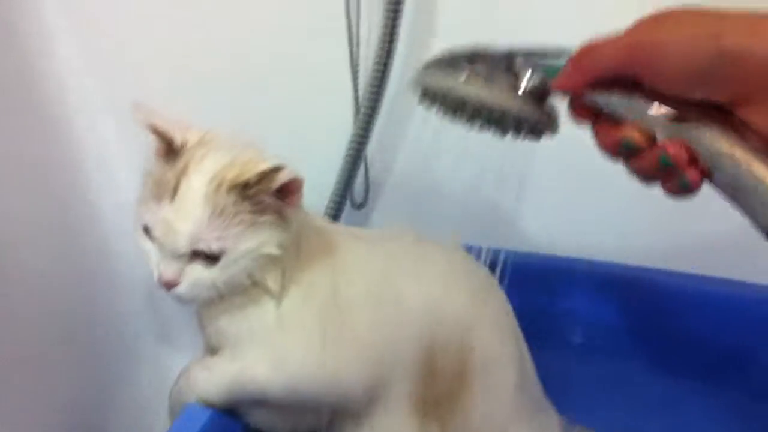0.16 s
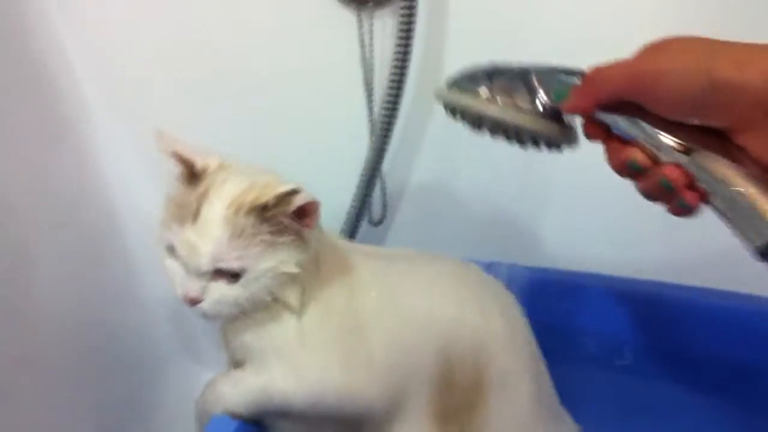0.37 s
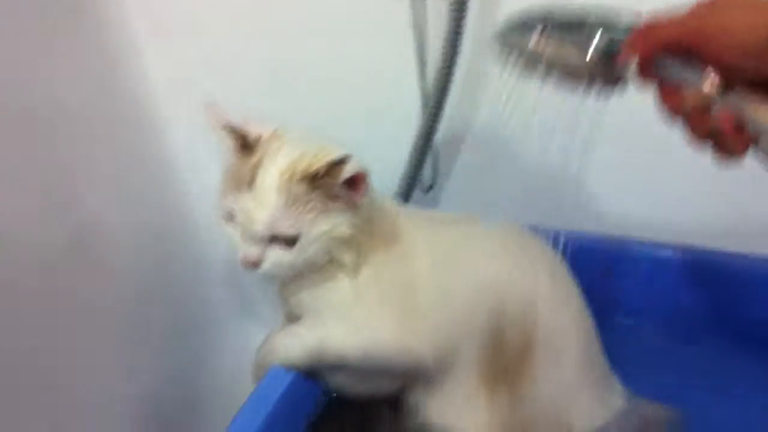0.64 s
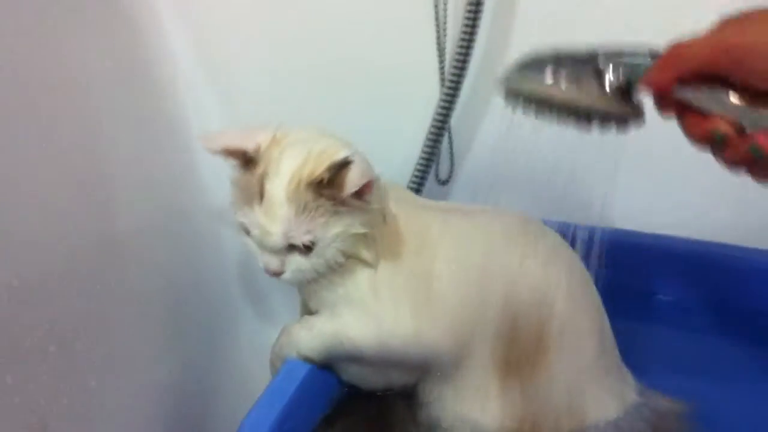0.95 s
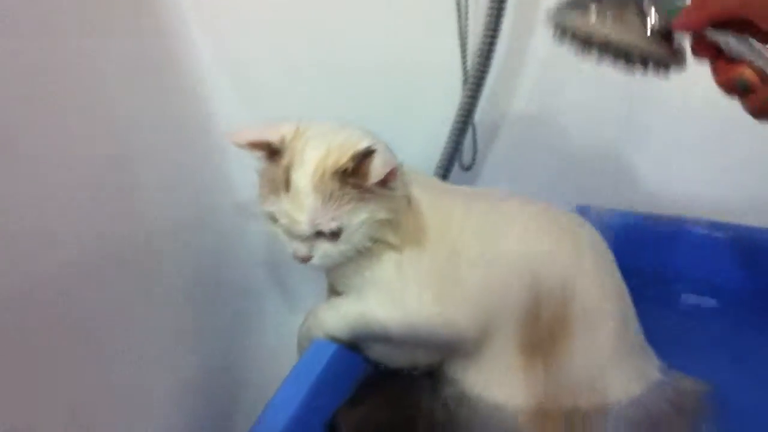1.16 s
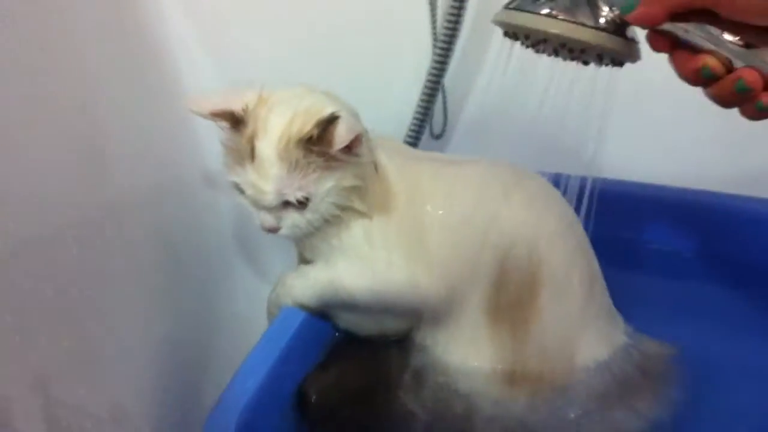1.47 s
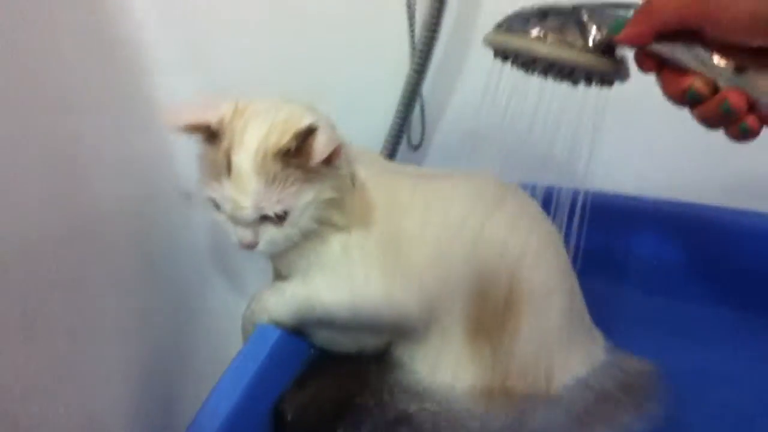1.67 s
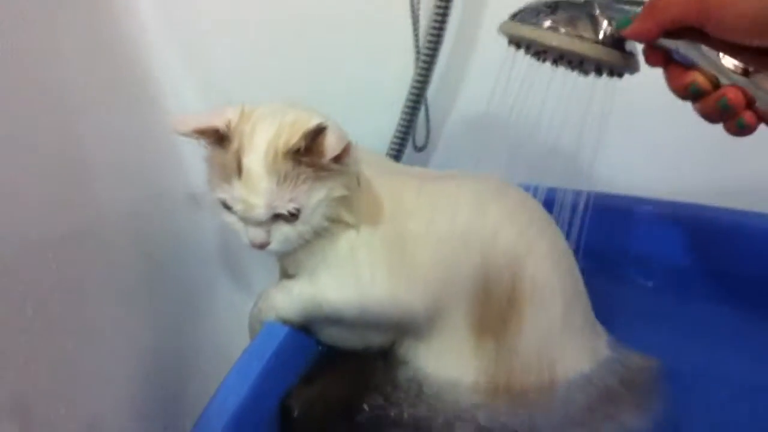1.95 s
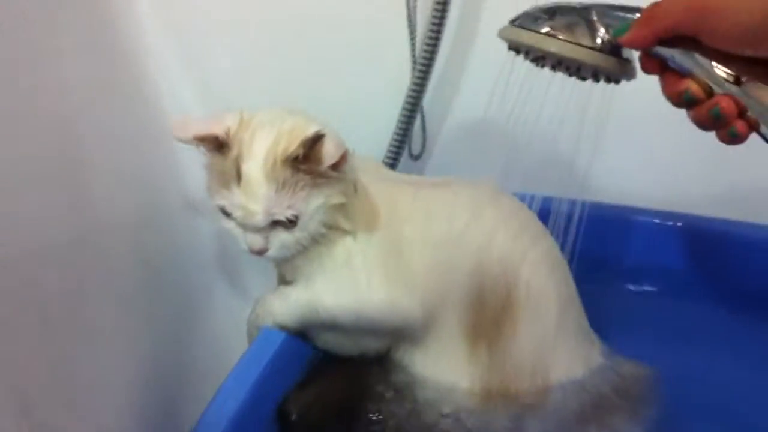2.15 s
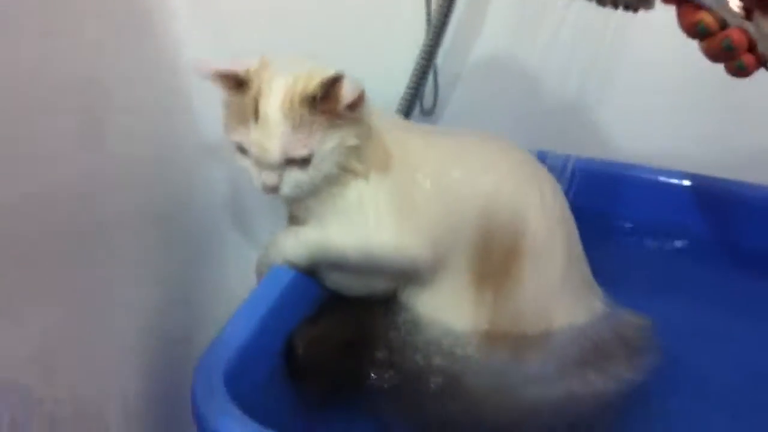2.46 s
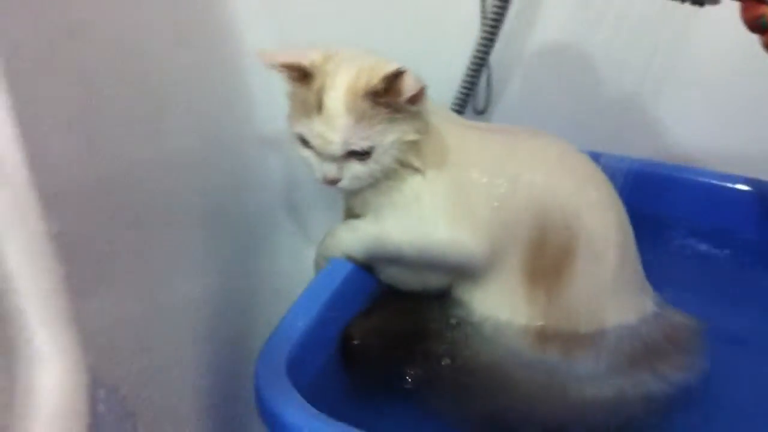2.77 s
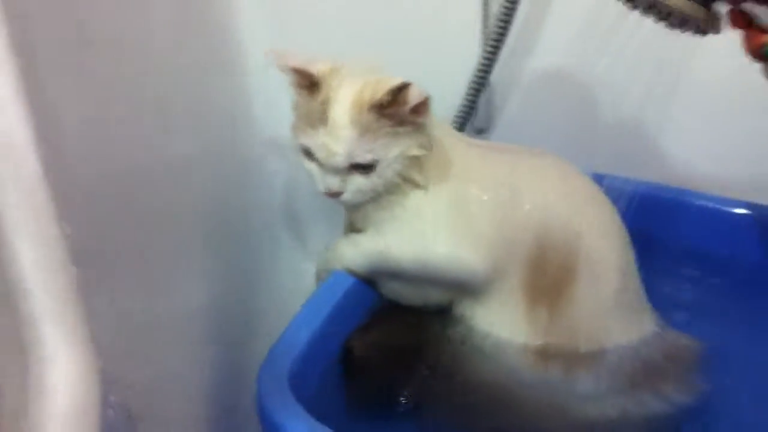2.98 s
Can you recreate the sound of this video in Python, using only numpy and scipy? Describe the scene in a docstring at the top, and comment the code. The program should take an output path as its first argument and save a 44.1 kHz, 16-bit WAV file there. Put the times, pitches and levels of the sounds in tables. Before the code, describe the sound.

Already running at 0 s, a hand shower hisses steadily while its jets patter and fizz on fur and bath water, with bubbling and plops. Splashing swells near 0.4, 0.7 and 1.1 s, where a soft low bump sounds; a brighter spatter with falling bubbles comes at 1.4 s. Bubbling continues, thinning after 2.5 s, with a very high click at 3.0 s. Faint hum and rumble, small tiled room.

```python
"""Water patters and fizzes at once over a steady hiss: a hand shower sprays a cat in a filled plastic tub.
Drops are filtered clicks with a fizz of tiny bubbles; they swell when the jets swing off the fur onto water.
Fading tones make the low bubbling, plops, ticks and splashes, in a small tiled bathroom. A soft bump is heard.
The hiss of the nozzles and a low rumble are filtered noise; a mains hum of pure tones lies underneath."""
import sys
import numpy as np
from scipy import signal
from scipy.fft import rfft, irfft, next_fast_len
from scipy.io import wavfile
from scipy.ndimage import uniform_filter1d

SR = 44100
rng = np.random.default_rng(int(sys.argv[2]) if len(sys.argv) > 2 else 0)


def generate_wav(sig):
    """Save sig (samples, or channels by samples) to the path in sys.argv[1] as 16-bit PCM at SR."""
    pcm = np.round(np.clip(np.atleast_2d(sig).T, -1, 1) * 32767).astype(np.int16)
    wavfile.write(sys.argv[1], SR, pcm)


N = 137592  # length in samples

# jets striking water and fur: [t/s, level/dB before the swing is widened]
PATTER_LEVEL = [(0, -40.5), (.09, -40.5), (.18, -44.5), (.32, -42), (.39, -40.5), (.5, -46.5), (.6, -42),
                (.69, -38.5), (.77, -45.5), (.87, -48), (.97, -43), (1.1, -38.5), (1.15, -41.5),
                (1.23, -48), (1.34, -46), (1.41, -39.5), (1.5, -39), (1.72, -40), (2.06, -43.5),
                (2.22, -43.5), (2.33, -43), (2.45, -46), (2.83, -49.5), (2.92, -44.5), (3.12, -45)]
# jets churning the bath: [t/s, level/dB before the mix of large and small bubbles]
CHURN_LEVEL = [(.02, -53), (.075, -43), (.14, -60), (.32, -52.5), (.37, -43.5), (.43, -53), (.5, -67),
               (.62, -56), (.68, -45.5), (.76, -51), (.84, -61), (.98, -55), (1.045, -45.5), (1.08, -40.5),
               (1.14, -45.5), (1.18, -59), (1.27, -51), (1.36, -65), (1.435, -42.5), (1.55, -47),
               (1.69, -44), (1.92, -44.5), (1.98, -45), (2.34, -50.5), (2.52, -46.5), (2.62, -62),
               (2.75, -64), (2.83, -53.5), (3.0, -48.5), (3.12, -52)]
# pitch of the large bubbles, lower as the jets dig deeper: [t/s, f/Hz]
BUBBLE_PITCH = [(.34, 1455), (.41, 1136), (.63, 1460), (.69, 1157), (.8, 940), (1.02, 1487), (1.09, 1134),
                (1.38, 1610), (1.43, 1277), (1.5, 1025), (1.57, 1345), (1.7, 993), (2.05, 1168),
                (2.35, 1029), (2.65, 1350), (2.9, 1128)]
# single plops, from blunt drop impacts to ringing large bubbles: [t/s, level/dB before fade and room, f/Hz,
# ring/cycles]
PLOP_TONES = [(0.0722, -28, 1250, 13), (0.1073, -38.5, 1421, 61), (.152, -30.5, 1730, 32),
              (0.1694, -35, 1400, 31), (.236, -28.5, 1470, 27), (.243, -28.5, 1356, 32),
              (0.2746, -26, 1110, 20), (.36, -34, 1380, 28), (.374, -32.5, 1117, 37),
              (.485, -35.5, 1230, 33), (.5229, -40, 1400, 60), (.577, -30, 1370, 28),
              (.602, -27.5, 1350, 18), (0.6544, -35, 1395, 65), (.673, -30, 990, 28),
              (0.695, -30.5, 994, 38), (1.0004, -28.5, 1350, 50), (1.079, -31, 1550, 45),
              (1.092, -36, 1065, 50), (1.135, -28.5, 1960, 59), (1.1364, -31, 1170, 50),
              (1.3967, -29.5, 2450, 43), (1.4535, -35, 1380, 65), (1.484, -36, 960, 42),
              (1.518, -36, 995, 56), (1.5741, -34.5, 1730, 80), (1.702, -35, 874, 47),
              (1.806, -30.5, 890, 24), (1.9172, -33, 1240, 45), (2.0194, -35, 985, 51),
              (2.1208, -35.5, 988, 67), (2.2022, -27.5, 1023, 15), (2.3046, -37.5, 960, 77),
              (2.3831, -33.5, 1043, 55), (2.997, -32.5, 1194, 49)]
# sharp ticks: tiny bursting bubbles, but the last row is a short, very high click of unknown cause:
# [t/s, level/dB before fade and room, f/Hz]
TICK_TONES = [(0.3928, -19, 12300), (.456, -22.5, 10400), (.641, -26.5, 4900), (0.839, -27, 7200),
              (1.3674, -18, 6560), (1.435, -15, 7350), (1.86, -27, 7000), (2.184, -26.5, 7100),
              (2.326, -23, 12200), (2.5389, -24, 8300), (2.87, -31, 4960), (2.971, -28, 4860),
              (3.0075, -14.5, 13600)]
# tone colour of the hiss, the drop impacts and the rumble: [f/Hz, relative level/dB]
NOZZLE_COLOUR = [(500, -18.5), (1200, -2.5), (2300, 4.5), (3300, 5), (4500, 0.5), (6500, -6.5), (8000, 4),
                 (10300, -12), (12500, 2.5), (17000, -0.5)]
SPLASH_COLOUR = [(400, -13), (800, -2.5), (1400, 1), (2300, 1.5), (3500, 0), (5000, 0.5), (7000, 1),
                 (13000, 2.5), (17000, -3)]
RUMBLE_COLOUR = [(22, -21), (40, -38), (70, -13), (100, 3.5), (145, -6), (190, 3), (340, 0.5), (500, -4.5),
                 (750, -8.5), (1600, -29)]
# mains hum lines and a weak neighbour: [f/Hz, rms level/dB]
HUM_TONES = [(100.1, -65), (119, -79), (200.4, -69)]
# tones of the bumped tub: [f/Hz, level/dB before rise and fade, ring/cycles]
KNOCK_TONES = [(119.4, -49, 53), (184, -44, 24), (309, -39.5, 48)]
# quick sweeps of the jets that slap the bath: [t/s, half width/s, level/dB before the room]
SLAP_SWEEPS = [(.38, 0.022, -46), (0.695, 0.024, -62), (1.116, 0.053, -57)]

# Clouds: _PER_S counts per second, _OCTAVES pitch scatter, _CYCLES typical ring, _SPREAD_DB mean extra size
NOZZLE_DB, RUMBLE_DB = -51, -56.5  # rms
PATTER_DB, PATTER_PER_S, PATTER_SPREAD_DB = 0, 9000, 3.5
PATTER_SWING = 1.2  # stretches the dB swings: open water swings wider than the spray as a whole
SPURT_DB, SPURT_PER_S = 1.11, 45  # random wavering of the patter level
FLICKER_DB, FLICKER_PER_S, FLICKER_BAND_HZ = 1.46, 30, 1530  # wavering of each frequency band
FIZZ_DB, FIZZ_PER_S, FIZZ_HZ = -6, 950, 8320
FIZZ_OCTAVES, FIZZ_CYCLES, FIZZ_SPREAD_DB = 0.53, 20, 2.5
CHURN_DB, CHURN_PER_S, CHURN_OCTAVES, CHURN_CYCLES, CHURN_SPREAD_DB = -1.5, 260, 0.222, 32.5, 1.7
SMALL_DB, SMALL_PER_S, SMALL_RATIO, SMALL_OCTAVES = -5, 260, 1.7, 0.415  # ratio to the large pitch
PLUNGE_S, PLUNGE_WIDTH_S, PLUNGE_DB = 1.415, 0.044, -50
PLUNGE_HZ, PLUNGE_OCTAVES_PER_S = 1940, 10.6  # pitch at PLUNGE_S, and how fast it falls
SPATTER_DB, SPATTER_HZ = -41.5, 5700
SLAP_HZ, SLAP_OCTAVES, SLAP_CYCLES = 3200, 0.25, 9.2
TICK_CYCLES = 39
TRICKLE_DB, TRICKLE_PER_S = -61, 98
KNOCK_S, KNOCK_RISE_S = 1.11, 0.014
ONSET_CYCLES = 0.9  # cycles a bubble takes to start ringing
GLIDE = 0.049  # share by which a bubble's pitch rises as it fades
RING_OCTAVES = 0.74  # ring lengths in a cloud vary by up to this much either way
SCATTER_LIMIT = 1.91  # how far bubble pitches stray, in standard deviations
ROOM_T60_S, ROOM_GAP_S = 0.46, 0.00472  # time to fade by 60 dB; silence before the first echo
ROOM_LOW_DB, ROOM_HIGH_DB = -5.5, -10  # echo against direct sound
TOP_HZ = 15800


def undb(db):
    """Turn decibels into gain."""
    return 10 ** (np.asarray(db) / 20)


def level(x, db):
    """Scale a sound to an rms level."""
    return x * undb(db) / np.sqrt(np.mean(x ** 2))


def curve(table):
    """Join table points with straight lines, one value per sample."""
    return np.interp(np.arange(N) / SR, *np.array(table, float).T)


def walk(rate):
    """Random levels held briefly and smoothed twice; spread near 1."""
    hold = int(SR / rate)
    steps = np.repeat(rng.standard_normal(N // hold + 1), hold)
    smooth = uniform_filter1d(uniform_filter1d(steps, hold), hold)
    return 1.3 * smooth[:N]


def colour(x, points):
    """Filter through the given points, with no sound before its cause."""
    hz, db = np.array(points, float).T
    size = 2 * next_fast_len(N)
    f = np.maximum(np.fft.rfftfreq(size, 1 / SR), 1)
    gain = undb(np.interp(np.log(f), np.log(hz), db))
    # folding the cepstrum forward in time gives the minimum-phase filter
    cepstrum = irfft(np.log(gain))
    cepstrum[1:size // 2] *= 2
    cepstrum[size // 2 + 1:] = 0
    return irfft(rfft(x, size) * np.exp(rfft(cepstrum)))[:N]


def shower_of(per_s, spread_db):
    """Random drops, one in each slot of time: times in s, sizes, and a bell-curve number each."""
    when, heavy, radius, angle = rng.random((int(per_s * N / SR), 4)).T
    times = (np.arange(len(when)) + when) / len(when) * N / SR
    sizes = undb(-spread_db * np.log(1 - heavy * .995))
    scatter = np.sqrt(-2 * np.log(1 - radius)) * np.cos(2 * np.pi * angle)
    return times, sizes, scatter


def bubbles(times, sizes, pitches, cycles):
    """Each bubble swells, rings for some cycles and rises in pitch as it fades by 60 dB."""
    out = np.zeros(N)
    pitches = np.clip(pitches, 100, SR / 2 - 2000)
    rings = cycles * np.ones(len(times))
    for s, size, hz, ring in zip(times, sizes, pitches, rings):
        start = max(int(s * SR), 0)
        length = max(min(int(ring / hz * SR), N - start), 0)
        turns = np.arange(length) * hz / SR
        age = turns / ring  # 0 at birth, 1 at the end
        swell = 1 - np.exp(-(turns / ONSET_CYCLES) ** 2)
        fade = np.exp(-np.log(1000) * age)
        tone = np.sin(2 * np.pi * turns * (1 + GLIDE * age / 2))
        out[start:start + length] += size * swell * fade * tone
    return out


def bubble_cloud(per_s, centre_hz, octaves, cycles, spread_db):
    """Many bubbles, varied in size, ring and pitch around a steady or moving centre; rms 1."""
    times, sizes, scatter = shower_of(per_s, spread_db)
    centres = np.interp(times * SR, np.arange(N), centre_hz * np.ones(N))
    limited = SCATTER_LIMIT * np.tanh(scatter / SCATTER_LIMIT)
    pitches = centres * 2 ** (octaves * limited)
    rings = cycles * 2 ** (RING_OCTAVES * rng.uniform(-1, 1, len(times)))
    return level(bubbles(times, sizes, pitches, rings), 0)


def patter():
    """Dense drop impacts with a fizz of tiny bubbles, swelling as the jets reach open water."""
    times, sizes, force = shower_of(PATTER_PER_S, PATTER_SPREAD_DB)
    clicks = np.bincount((times * SR).astype(int), sizes * np.sign(force), N + 1)[:N]
    impacts = level(colour(clicks, SPLASH_COLOUR), PATTER_DB)
    fizz = bubble_cloud(FIZZ_PER_S, FIZZ_HZ, FIZZ_OCTAVES, FIZZ_CYCLES, FIZZ_SPREAD_DB)
    db = curve(PATTER_LEVEL)
    # swings are stretched downward from the loudest moment
    swell = undb(db.max() + PATTER_SWING * (db - db.max()) + SPURT_DB * walk(SPURT_PER_S))
    return swell * flicker(impacts + undb(FIZZ_DB) * fizz)


def flicker(x):
    """The splash changes colour as the jets wander: overlapping bands waver on their own."""
    spectrum = rfft(x)
    place = np.fft.rfftfreq(N, 1 / SR) / FLICKER_BAND_HZ
    out = np.zeros(N)
    for k in range(14):
        band = irfft(spectrum * np.maximum(1 - abs(place - k), 0), N)
        out += band * undb(FLICKER_DB * walk(FLICKER_PER_S))
    return out


def churn():
    """Air driven under the surface rings as large bubbles and smaller offspring."""
    hz = curve(BUBBLE_PITCH)
    large = bubble_cloud(CHURN_PER_S, hz, CHURN_OCTAVES, CHURN_CYCLES, CHURN_SPREAD_DB)
    small = bubble_cloud(SMALL_PER_S, hz * SMALL_RATIO, SMALL_OCTAVES, CHURN_CYCLES, CHURN_SPREAD_DB)
    return undb(curve(CHURN_LEVEL)) * (undb(CHURN_DB) * large + undb(SMALL_DB) * small)


def plunge():
    """The jets slide off the fur into the bath: a bright spatter, and bubbles that grow and drop in pitch."""
    since = np.arange(N) / SR - PLUNGE_S
    hz = PLUNGE_HZ * 2 ** np.clip(-PLUNGE_OCTAVES_PER_S * since, -1, 1)
    # the negative spread makes a few bubbles weaker instead of stronger
    growing = undb(PLUNGE_DB) * bubble_cloud(500, hz, octaves=0.17, cycles=30, spread_db=-2.0)
    spatter = undb(SPATTER_DB) * bubble_cloud(800, SPATTER_HZ, octaves=0.32, cycles=24, spread_db=2.1)
    return np.exp(-(since / PLUNGE_WIDTH_S) ** 2) * (growing + spatter)


def slaps():
    """Each quick sweep across the bath throws up a burst of mid-sized bubbles."""
    t = np.arange(N) / SR
    swell = sum(undb(db) * np.exp(-((t - s) / width) ** 2) for s, width, db in SLAP_SWEEPS)
    return swell * bubble_cloud(1500, SLAP_HZ, SLAP_OCTAVES, SLAP_CYCLES, spread_db=3.0)


def plops():
    """Single plops ring low and stand out of the churn: short ones are drop impacts, longer ones large bubbles."""
    times, db, hz, cycles = np.array(PLOP_TONES, float).T
    return bubbles(times, undb(db), hz, cycles)


def ticks():
    """Tiny bubbles, and one very high click near the end, sound as short high tones above the spray."""
    times, db, hz = np.array(TICK_TONES, float).T
    # the click is made with the same fading tone as the bubbles
    return bubbles(times, undb(db), hz, TICK_CYCLES)


def trickle():
    """Stray droplets tick on the tub and the tiles throughout, as short high tones."""
    return undb(TRICKLE_DB) * bubble_cloud(TRICKLE_PER_S, 10700, octaves=0.32, cycles=9, spread_db=9.5)


def knock():
    """A soft, low bump, as of the water-filled tub: a few tones that rise gently and ring away."""
    age = np.maximum(np.arange(N) / SR - KNOCK_S, 0)
    ring = np.zeros(N)
    for hz, db, cycles in KNOCK_TONES:
        fade = np.exp(-np.log(1000) * age * hz / cycles)
        ring += undb(db) * np.sin(2 * np.pi * hz * age) * fade
    return ring * (1 - np.exp(-(age / KNOCK_RISE_S) ** 2))


def nozzles():
    """Smooth hiss of water leaving the shower head: steady noise, filtered."""
    return level(colour(rng.standard_normal(N), NOZZLE_COLOUR), NOZZLE_DB)


def background():
    """Mains hum, made of pure tones, over a steady low rumble of filtered noise."""
    t = np.arange(N) / SR
    hum = sum(level(np.sin(2 * np.pi * (hz * t + rng.random())), db) for hz, db in HUM_TONES)
    rumble = level(colour(rng.standard_normal(N), RUMBLE_COLOUR), RUMBLE_DB)
    return hum + rumble


def bathroom(x, wet_db):
    """Direct sound plus the short, dense ring of tiled walls, made of fading noise."""
    t = np.arange(SR // 2) / SR
    tail = rng.standard_normal(len(t)) * np.exp(-np.log(1000) * t / ROOM_T60_S) * (t > ROOM_GAP_S)
    wet = signal.fftconvolve(x, tail / np.sqrt(np.sum(tail ** 2)))[:N]
    return (x + undb(wet_db) * wet) / np.hypot(1, undb(wet_db))


def scene():
    """Bubbling and splashing ring in the room; the bump, hiss, hum and rumble are added directly."""
    low = bathroom(churn() + plops(), ROOM_LOW_DB)
    high = bathroom(patter() + plunge() + slaps() + trickle() + ticks(), ROOM_HIGH_DB)
    return (low + high + knock() + nozzles() + background())[None]


def record(dry):
    """A steep low-pass filter removes the very highest treble."""
    steep = signal.ellip(10, .2, 80, TOP_HZ, fs=SR, output="sos")
    return signal.sosfilt(steep, dry)


dry = scene()
out = record(dry)
generate_wav(out)
```